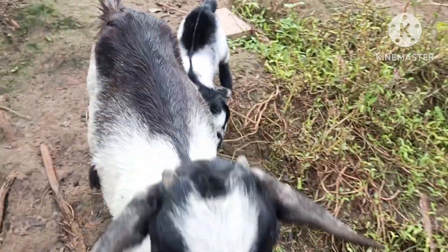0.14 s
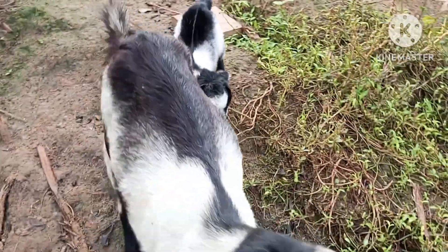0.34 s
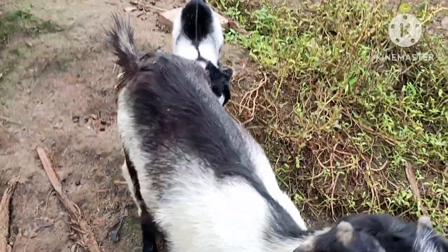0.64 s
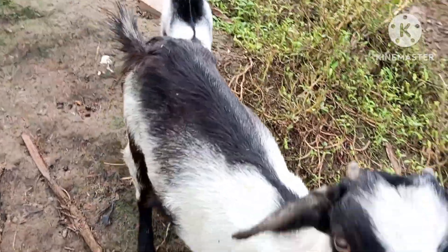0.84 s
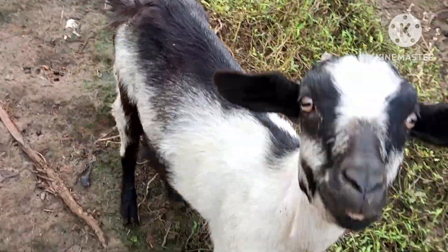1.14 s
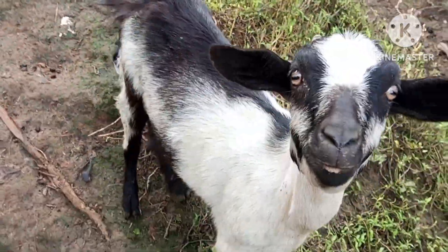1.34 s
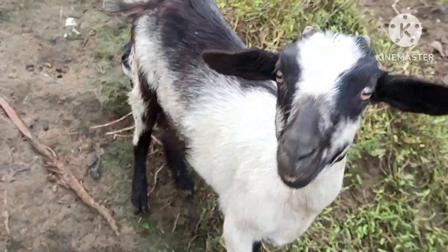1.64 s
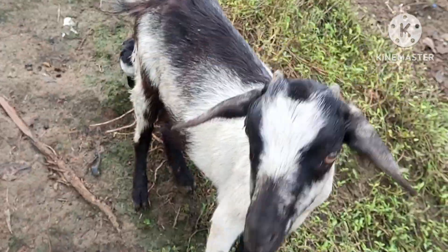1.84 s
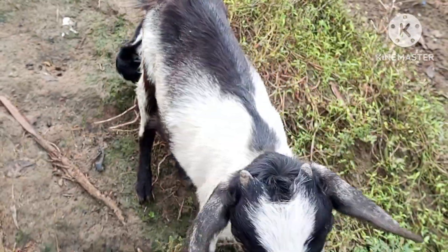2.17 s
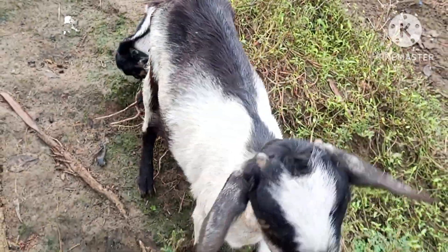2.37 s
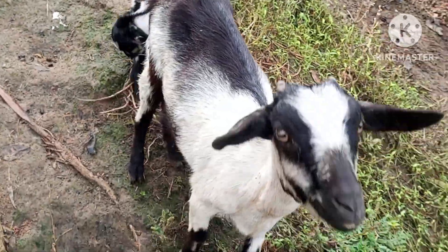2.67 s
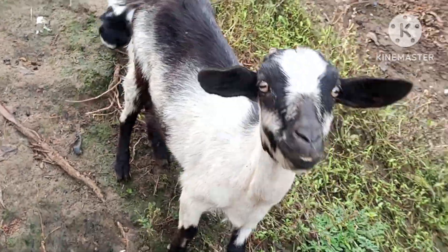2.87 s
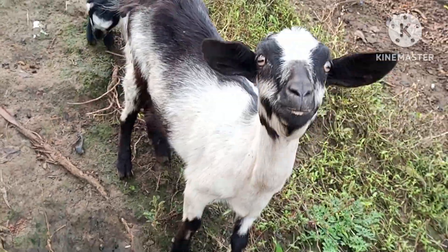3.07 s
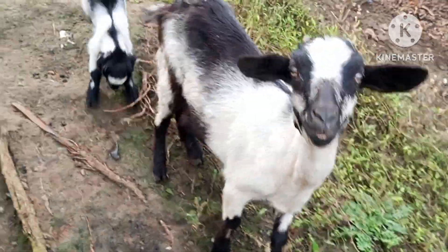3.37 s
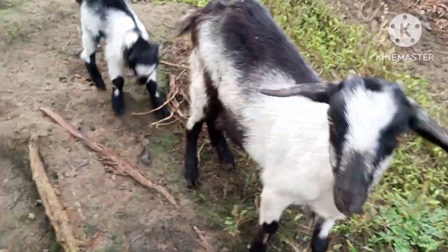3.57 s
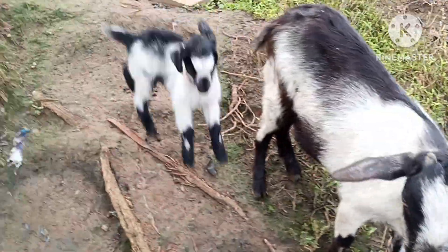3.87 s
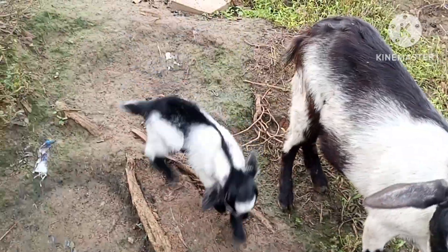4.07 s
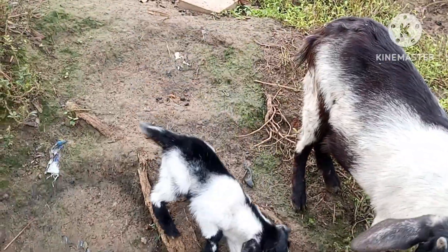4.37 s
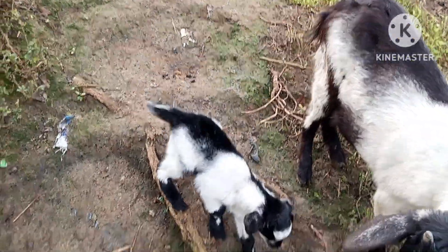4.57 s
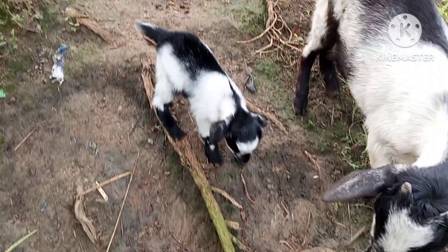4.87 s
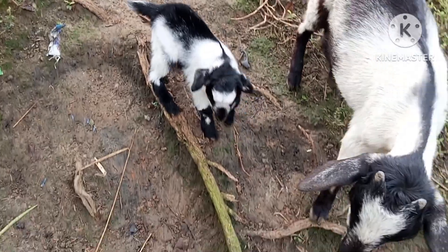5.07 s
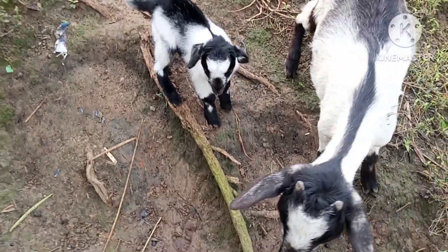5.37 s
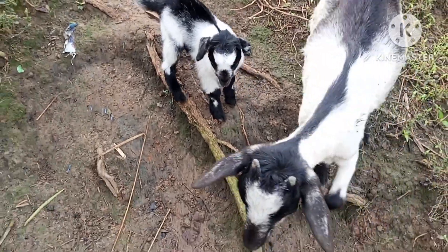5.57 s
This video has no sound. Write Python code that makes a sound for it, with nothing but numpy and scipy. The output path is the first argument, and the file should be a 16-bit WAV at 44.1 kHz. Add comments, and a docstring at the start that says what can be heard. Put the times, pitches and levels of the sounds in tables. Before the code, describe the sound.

Close twig snaps and leafy rustles from moving goats open the scene over soft air noise. A thin pulsing bird whistle leads into a strong rooster crow, echoing lightly off the surroundings, its long note rough and breaking. Then a weak distant crow replies among falling chirps, with sharper hoof knocks near the microphone around four seconds.

```python
"""Soft crackling hiss, a short low hum falls away and a goat's step snaps twigs; then a rooster crows. A second
rooster answers from far away. Both voices are wavering tones with overtones on top. Small birds chirp and
whistle with sliding or pulsing tones. Goats step and scuff: shaped bursts of noise, with stretches of crackling
hiss between. Random echoes throw the calls back, over soft air noise, a hiss and a faint hum."""
import sys
import numpy as np
from scipy import signal
from scipy.fft import rfft, irfft
from scipy.io import wavfile
from scipy.ndimage import uniform_filter1d

SR = 44100
rng = np.random.default_rng(int(sys.argv[2]) if len(sys.argv) > 2 else 0)


def wrap_up_sound(samples):
    """Save the sound to the file named by the first command line argument, as 16-bit audio."""
    columns = np.atleast_2d(samples).T
    # keep every value between -1 and 1, then stretch to whole-number steps
    tamed = np.clip(columns, -1, 1)
    steps = np.round(tamed * 32767).astype(np.int16)
    wavfile.write(sys.argv[1], SR, steps)


N = 252252
TIME, FREQS = np.arange(N) / SR, np.fft.rfftfreq(N, 1 / SR)  # s, Hz
ONSET_S, RELEASE_S = 0.022, .02  # of every syllable and voice break


# a soft cluck, then the short syllables that open the crow:
# start t/s, length t/s, top pitch f/Hz, effort level/dB, overtones level/dB, roughness 0-1
SYLLABLES = [(1.124, 0.051, 790, -56.5, -97, 0.54), (1.402, 0.096, 726.2, -45, -54, 0.02),
             (1.507, .08, 760, -53.5, -62.5, .45), (1.614, 0.17, 920, -31, -57.5, .14)]
# the long closing note:
# t/s, pitch f/Hz, roughness 0-1, effort level/dB, overtones level/dB, open-beak ring level/dB
LONG_NOTE = [(1.777, 775, .7, -45.5, -51, -64), (1.835, 846, .3, -29, -65, -62),
             (1.87, 884, 0.29, -37, -61.5, -65), (1.959, 895, .6, -41, -58, -66),
             (2.01, 867.5, 0.3, -37.5, -76.5, -74.5), (2.18, 851.8, .4, -43, -68.5, -86),
             (2.36, 793.7, 0.2, -35.5, -68, -78), (2.46, 677, .2, -52.5, -66, -66.5),
             (2.56, 702, .15, -43.5, -64.5, -74.5), (2.781, 708, 0.33, -53, -62.5, -67),
             (2.88, 690, .06, -44, -60.5, -67), (3.088, 668.4, 0.2, -47.5, -62, -90),
             (3.212, 547, 0.3, -60, -77, -79)]
# the windpipe favours the fundamental as it sweeps through its resonance: f/Hz, level/dB
WINDPIPE = [(560, -14.5), (700, -4.5), (790, -8.5), (840, -2), (880, -7.5), (920, -23)]
# the band where the open beak rings: f/Hz, level/dB
BEAK_BAND = [(5150, -39), (5600, 5), (6100, 5), (6500, -27)]
ARCH_PER_S = 1.3  # share by which the pitch lies lower at a syllable's ends, per second of its length


def rooster(beak_below_db=-6):
    """Short syllables, then a long hoarse note that splits in two, clears and sinks."""
    opening = []
    for start, length, hz, effort, strain, rough in SYLLABLES:
        opening.append((start, length, hz, rough, effort, strain, strain + beak_below_db))
    gate, hz, rough, effort_db, strain_db, beak_db = phrase(opening, LONG_NOTE, ARCH_PER_S)
    level = gain_of(effort_db + read(WINDPIPE, hz))
    low, high = syrinx(hz, np.clip(rough, 0, 1), jitter=.06, shimmer=.55, rasp=.4)
    second, second_low, second_high = second_voice()
    # both sides of the voice organ draw on one airstream
    share = np.clip(1 - (second / level) ** 2, .3, 1)
    first = uniform_filter1d(gate * level * np.sqrt(share), size=500)
    edge = gate * gain_of(strain_db) * high + second_high
    ring = gate * gain_of(beak_db) * coloured(high, BEAK_BAND)
    body = yard(first * low + second_low, wet_db=-4.5)
    # the beamed overtones carry more echo than the body
    return body + yard(edge + ring, wet_db=-3.0)


# weight of the overtones: f/Hz, level/dB
THROAT = [(1100, -4), (1450, -0.5), (1850, 2), (1940, 3), (2040, -7), (2130, -16), (2400, -7),
          (2750, -28.5), (3450, -11.5), (4100, -20), (4500, -31), (4800, -16), (5150, -30), (5700, -25),
          (7000, -21.5), (9000, -60.5)]
HOARSE_PULSES_HZ, HOARSE_PULSE_DEPTH = 33, 1  # depth is scaled by the roughness


def syrinx(hz, rough, jitter, shimmer, rasp):
    """A fluttering membrane: its fundamental, and its overtones and pulsed rasp through the throat."""
    unsteady_hz = hz * (1 + jitter * (rough + .06) * wander(110))
    phase = 2 * np.pi * np.cumsum(unsteady_hz) / SR
    # hoarse stretches slip into a three-cycle pattern
    growl = rough ** 2 * np.cos(phase / 3 + wander(40))
    pulses = HOARSE_PULSE_DEPTH * np.cos(2 * np.pi * HOARSE_PULSES_HZ * TIME + 2 * wander(6.4))
    flutter = 1 + rough * (shimmer * wander(60) + pulses) + .12 * growl
    closure = phase + .22 * rough * wander(450) + .45 * growl
    overtones = np.zeros(N)
    for k in range(2, 13):
        weight = gain_of(read(THROAT, k * hz) + 3.9 * wander(21))
        overtones += weight * np.cos(k * closure)
    # breath noise that swells once per cycle
    breath = rng.standard_normal(N) * (1 + np.cos(phase))
    puffs = coloured(breath, [(500, -30)] + THROAT)
    fundamental = np.sqrt(2) * flutter * np.cos(phase)
    return fundamental, np.sqrt(2) * flutter * overtones + rasp * rough * puffs


# the other side of the syrinx breaks into a pitch of its own:
# start t/s, length t/s, starting pitch f/Hz, level/dB
SECOND_VOICE = [(1.472, 0.05, 880, -57), (1.512, 0.03, 1158, -53.5), (2.53, .05, 581, -62.5),
                (2.579, 0.28, 785, -51.5), (2.673, 0.1, 613.4, -62), (2.9, 0.14, 769, -63.5)]
SECOND_SAG_HZ_PER_S = 50


def second_voice(jitter=0.017, shimmer=0.55, octave_db=-12):
    """Brief, unsteady breaks at a slowly sagging pitch: their level, fundamental and octave."""
    level, low, octave = np.zeros((3, N))
    for start, length, pitch_hz, db in SECOND_VOICE:
        envelope = gain_of(db) * held(start, length, ONSET_S, RELEASE_S)
        on = envelope > 0
        sagging_hz = pitch_hz - SECOND_SAG_HZ_PER_S * (TIME[on] - start)
        hz = sagging_hz * (1 + jitter * wander(110)[on])
        phase = 2 * np.pi * np.cumsum(hz) / SR
        swell = np.sqrt(2) * envelope[on] * (1 + shimmer * wander(49)[on])
        level += envelope
        low[on] += swell * np.cos(phase)
        octave[on] += swell * gain_of(octave_db + read(THROAT, 2 * hz)) * np.cos(2 * phase)
    return level, low, octave


# syllables of the far rooster:
# start t/s, length t/s, top pitch f/Hz, fundamental level/dB, octave level/dB
FAR_SYLLABLES = [(3.43, 0.12, 945, -67.5, -91), (3.73, 0.13, 839, -83.5, -60.5),
                 (3.98, .08, 947, -65, -62.5), (4.05, .16, 838.4, -58, -64.5)]
# its long note: t/s, pitch f/Hz, fundamental level/dB, octave level/dB
FAR_NOTE = [(4.189, 937, -62, -59.5), (4.251, 965, -77, -57), (4.359, 940, -80, -75.5),
            (4.5, 950, -77.5, -54.5), (4.57, 937, -79, -56), (4.593, 916, -49.5, -53),
            (4.679, 919, -67.5, -58), (4.821, 863, -96, -72), (5.05, 846, -89.5, -66.5),
            (5.17, 845.5, -83, -57), (5.279, 844, -95.5, -85)]
FAR_ARCH_PER_S = .6  # pitch arch, counted as for the near rooster
# where its voice splits and a side tone rides above its octave
FAR_SPLIT_START_S, FAR_SPLIT_LENGTH_S = 4.42, 0.417
FAR_SPLIT_RATIO, FAR_SPLIT_DB = 1.11, -7  # pitch and level against the octave


def far_rooster(jitter=0.021):
    """Little but the two lowest partials carries this far, hoarse and briefly split."""
    gate, hz, low_db, octave_db = phrase(FAR_SYLLABLES, FAR_NOTE, FAR_ARCH_PER_S)
    phase = 2 * np.pi * np.cumsum(hz * (1 + jitter * wander(110.3))) / SR
    upper = np.cos(2 * phase) + gain_of(-22.5) * np.cos(3 * phase) + gain_of(-17.5) * np.cos(4 * phase)
    split_time = held(FAR_SPLIT_START_S, FAR_SPLIT_LENGTH_S, ONSET_S, RELEASE_S)
    split = gain_of(FAR_SPLIT_DB) * split_time * wander(60)
    side_tone = split * np.cos(2 * FAR_SPLIT_RATIO * phase)
    call = gain_of(low_db) * np.cos(phase) + gain_of(octave_db) * (upper + side_tone)
    return yard(gate * call * (1 + .5 * wander(37)), wet_db=-2.5)


# a long thin bird whistle: t/s, pitch f/Hz, level/dB
WHISTLE = [(.77, 3160, -71), (.815, 3170, -53.5), (.97, 3287, -55), (1.17, 3270, -46.5),
           (1.31, 3305, -55.5), (1.48, 3307, -61), (1.53, 3340, -77)]
WHISTLE_PULSES_HZ, WHISTLE_PULSE_DEPTH = 42, 0.38


def whistler():
    """A bird's one nearly pure, quickly pulsing note."""
    gate, hz, level_db = curves(WHISTLE)
    phase = 2 * np.pi * np.cumsum(hz * (1 + 0.0083 * wander(80))) / SR
    buzz = 1 + 0.13 * np.cos(2 * np.pi * 465 * TIME + wander(40))  # weak side tones
    pulsing = 1 + WHISTLE_PULSE_DEPTH * np.cos(2 * np.pi * WHISTLE_PULSES_HZ * TIME + wander(23))
    return yard(gate * gain_of(level_db) * buzz * pulsing * np.cos(phase), wet_db=-1)


# falling chirps: t/s, length t/s, start f/Hz, level/dB
CHIRPS = [(0.126, 0.034, 4370, -65.5), (0.34, 0.032, 3870, -54.5), (0.495, .075, 4425, -48.5),
          (0.802, 0.042, 2700, -58.5), (0.811, .075, 4655, -60), (1.131, .09, 4740, -53.5),
          (1.317, .105, 3032, -55), (1.419, .075, 4610, -58), (1.779, 0.077, 4160, -55),
          (2.56, 0.09, 4440, -59.5), (2.984, .11, 4710, -52.5), (3.335, .04, 4290, -56),
          (3.694, 0.079, 4400, -55), (4.368, 0.055, 4120, -67), (4.982, 0.038, 2927, -59.5),
          (5.518, 0.046, 4490, -54)]
SLIDE_HZ_PER_S = 9500  # total fall per second of a chirp's length


def chirps():
    """Quick, trembling slides that flatten out and linger; the longer, the further they fall."""
    out = np.zeros(N)
    for start, length, start_hz, db in CHIRPS:
        u = np.linspace(0, 1, int(length * SR))  # progress through the chirp
        hz = start_hz - SLIDE_HZ_PER_S * length * (1 - (1 - u) ** 1.5)
        hz = hz * (1 + .011 * burst(150, 1)[:len(u)])
        swell = np.sqrt(4 * u * (1 - u)) * gain_of(3 * burst(60, 1)[:len(u)])
        add(out, start, gain_of(db) * swell * np.sin(2 * np.pi * np.cumsum(hz) / SR))
    return yard(out, wet_db=1)


# twigs and grit snapping under hooves:
# t/s, level/dB before the fade, centre f/Hz, spread in octaves, time to fade by 60 dB t/s
SNAPS = [(.086, -55.5, 3660, 0.49, 0.029), (0.245, -53, 6850, 1, 0.019), (.454, -37, 4200, .8, 0.022),
         (0.456, -55, 7900, 1.1, 0.07), (0.563, -45.5, 2610, 1, 0.034), (0.579, -58, 7440, .7, 0.045),
         (0.63, -52, 1710, 0.89, 0.14), (0.851, -66.5, 9850, 0.5, 0.092), (1.277, -54, 9150, 0.53, .019),
         (3.664, -57, 3060, 0.86, 0.11), (3.836, -55.5, 2080, 0.75, .12), (3.857, -48.5, 4460, 0.45, 0.008),
         (4.019, -48.5, 1770, 0.61, .061), (4.065, -47, 6500, 0.8, 0.015),
         (4.259, -24.5, 2745, 0.54, 0.0044), (4.489, -72.5, 9040, 0.88, 0.27),
         (4.941, -56, 4560, 0.44, 0.033), (4.986, -55, 3970, 0.44, 0.023), (5.178, -64, 8090, .7, 0.066),
         (5.432, -43.5, 6800, 0.3, 0.013), (5.525, -60, 8400, 0.66, 0.043)]
# hooves and knocks on soil and wood: same columns as the snaps
KNOCKS = [(.09, -47.5, 920, 0.78, 0.048), (.547, -36.5, 1160, 0.025, 0.076), (3.498, -51, 213, 0.37, 0.11),
          (3.496, -42, 875, 0.047, 0.047), (4.051, -32, 604, 0.56, 0.059), (4.066, -56.5, 180, 0.62, 0.085),
          (4.29, -51.5, 144, 0.19, 0.074), (4.262, -47, 720, 0.46, 0.13), (4.288, -41.5, 540, 0.78, 0.05),
          (4.887, -56, 1010, 1.03, 0.24), (4.896, -45, 368, 0.28, 0.046)]
# hooves dragging through dirt: start t/s, length t/s, level/dB, centre f/Hz
SCUFFS = [(0.456, 0.269, -58, 3160), (3.203, 0.081, -59.5, 3730), (3.631, 0.079, -70, 4540),
          (4.261, 0.016, -62, 2220), (4.723, 0.14, -67.5, 3150)]


def goats():
    """Snaps, dull knocks and gritty scuffs close by, all made from short bursts of noise."""
    drag, steps = np.zeros((2, N))
    for start, length, db, hz in SCUFFS:
        grit = burst(hz, 0.54)[:int(length * SR)]
        add(drag, start, gain_of(db) * grit * signal.windows.tukey(len(grit), .12))
    # the grit flickers but keeps its overall level
    drag = np.std(drag) * patchy(drag * gain_of(2.5 * wander(200)), depth_db=4.5)
    for start, db, hz, octaves, t60 in SNAPS:
        add(steps, start, hit(db, hz, octaves, t60, rise_s=.00015))
    for start, db, hz, octaves, t60 in KNOCKS:
        add(steps, start, hit(db, hz, octaves, t60, rise_s=0.011))
    return steps + drag


# stretches of crackling hiss: start t/s, length t/s, level/dB at the start
HISS_STRETCHES = [(-.02, 0.11, -66), (.15, 0.93, -63), (0.43, 0.263, -60), (0.823, 0.053, -71), (1.023, 0.35, -69),
                  (1.363, 0.21, -69), (1.653, 1.3, -69.5), (3.21, 0.19, -60), (3.477, 0.085, -65.5),
                  (3.609, 0.072, -61.5), (3.71, .17, -65.5), (3.999, 0.11, -59.5), (4.122, 0.15, -69.5),
                  (4.245, 0.076, -59), (4.458, 0.41, -66.5), (5.113, 0.14, -66.5), (5.26, 0.17, -69),
                  (5.385, 0.33, -65)]
# colour of the fizz: f/Hz, relative level/dB per Hz
FIZZ = [(500, -37), (1500, -15), (2800, -3), (3800, 2.5), (4400, 4.5), (5050, -10.5), (5800, 4),
        (7000, 6.5), (8000, -2), (9500, -24), (12000, -16), (15500, -30)]
# colour of the separate crackles: f/Hz, relative level/dB per Hz
CRACKLES = [(500, -39.5), (2000, -2), (4000, -1), (7000, 8), (9500, -15.5), (12000, -7), (15500, -15)]
STRETCH_ATTACK_S, STRETCH_RELEASE_S = 0.023, 0.017
STRETCH_FADE_DB, FIZZ_REST_DB = -5, -80.5  # fade over one stretch; level between stretches


def crackling_hiss():
    """Each stretch is a patchy fizz with separate crackles, fading as it goes."""
    level = gain_of(FIZZ_REST_DB) * np.ones(N)
    for start, length, db in HISS_STRETCHES:
        fade_db = STRETCH_FADE_DB * np.clip((TIME - start) / length, 0, 1)
        envelope = held(start, length, STRETCH_ATTACK_S, STRETCH_RELEASE_S)
        level = np.hypot(level, gain_of(db + fade_db) * envelope)
    # about 200 clicks a second, a few much louder than the rest
    clicks = rng.standard_normal(N) * (rng.random(N) < 200 / SR)
    crackles = clicks * gain_of(4.5 * np.minimum(rng.exponential(1, N), 3))
    fizz = patchy(rng.standard_normal(N), depth_db=4)
    return level * (coloured(fizz, FIZZ) + gain_of(-13.5) * coloured(crackles, CRACKLES))


# colour of the still air: f/Hz, relative level/dB per Hz
AIR = [(15, -79.5), (25, -6), (44, -2), (136, 7.5), (331, -3.5), (804, -1.5), (1170, -2.5), (1900, 2.5),
       (3260, -8.5), (3830, 2), (5010, -16), (5880, -0.5), (6920, -12), (9050, -41.5), (15500, -27)]
AIR_DB = -76
# a broad hiss swells under the long note: t/s, level/dB
HISS = [(1.6, -75), (1.93, -66), (1.99, -61.5), (2.29, -67), (2.35, -60.5), (2.53, -67.5), (2.62, -64),
        (3.1, -82)]
# its colour: f/Hz, relative level/dB per Hz
HISS_COLOUR = [(500, -10.5), (1000, 10), (2000, 11.5), (3500, 4), (5000, 0.5), (9000, -12.5),
               (15500, -15.5)]
HUM_HZ, HUM_LOUD_S = 101, .11
HUM_START_DB, HUM_FALL_DB_PER_S, HUM_REST_DB = -52.5, 130, -99


def background():
    """Still outdoor air, a swell of hiss, and a low hum that soon falls away."""
    air = coloured(patchy(rng.standard_normal(N), depth_db=4.0), AIR)
    air = gain_of(AIR_DB) * air * gain_of(.5 * wander(1.6))
    gate, hiss_db = curves(HISS)
    hiss_level = gate * gain_of(hiss_db + 1.8 * wander(50))
    hiss = hiss_level * coloured(rng.standard_normal(N), HISS_COLOUR)
    falling = gain_of(HUM_START_DB - HUM_FALL_DB_PER_S * TIME)
    hum_level = falling * held(0, HUM_LOUD_S, 0.0033, 0.045) + gain_of(HUM_REST_DB)
    rumble_colour = [(70, -24.5), (110, 3), (190, 4), (300, -23.5), (900, -63.5)]  # f/Hz, level/dB
    rumble = coloured(rng.standard_normal(N), rumble_colour)
    tone = np.sqrt(2) * np.sin(2 * np.pi * HUM_HZ * TIME)
    return air + hiss + hum_level * (tone + 0.5 * rumble)


# how long the echoes last: f/Hz, time to fade by 60 dB t/s
YARD = [(200, 0.043), (900, 0.46), (3500, 0.46), (9000, 0.19)]


def yard(x, wet_db):
    """Direct sound plus scattered echoes off walls and trees, each band dying at its own speed."""
    # random echoes, about 1500 a second, none in the first 12 ms
    taps = rng.choice([-1., 1.], SR) * (rng.random(SR) < 1500 / SR) * (TIME[:SR] > .012)
    hz, t, z = signal.stft(taps, SR, nperseg=256)
    decay = gain_of(-60 * t / read(YARD, hz)[:, None])
    tail = signal.istft(z * decay, SR, nperseg=256)[1]
    echo = signal.fftconvolve(x, tail)[:N]
    wet = gain_of(wet_db)
    return (x + wet * evened(echo) * np.std(x)) / np.sqrt(1 + wet ** 2)


def phrase(syllables, long_note, arch_per_s):
    """Syllables that each arch in pitch, then a long note: gate, pitch and further controls over time."""
    gate, hz, *controls = curves(long_note)
    for start, length, top_hz, *values in syllables:
        envelope = held(start, length, ONSET_S, RELEASE_S)
        inside = envelope > gate
        from_middle = 2 * (TIME[inside] - start) / length - 1  # -1 at the start, 1 at the end
        hz[inside] = top_hz * (1 - arch_per_s * length * from_middle ** 2)
        for control, value in zip(controls, values):
            control[inside] = value
        gate = np.maximum(gate, envelope)
    return [gate, hz] + [uniform_filter1d(c, size=300) for c in controls]


def curves(rows):
    """A gate that is open while the rows last, then each column drawn as a line over time."""
    t, *columns = np.transpose(rows)
    gate = uniform_filter1d(1. * ((TIME >= t[0]) & (TIME <= t[-1])), size=400)
    return [gate] + [np.interp(TIME, t, c) for c in columns]


def held(start, length, attack_s, release_s):
    """An envelope that rises, holds and falls."""
    rise = (TIME - start) / attack_s
    fall = (start + length - TIME) / release_s
    return np.clip(np.minimum(rise, fall), 0, 1)


def hit(db, hz, octaves, t60, rise_s):
    """A blow is a burst of noise that rises fast and dies away."""
    ring = burst(hz, octaves)
    t = TIME[:len(ring)]
    return gain_of(db) * ring * (1 - np.exp(-t / rise_s)) * np.exp(-np.log(1000) * t / t60)


def burst(hz, octaves, size=16384):
    """A short stretch of noise in one broad resonance."""
    away = np.log2((np.fft.rfftfreq(size, 1 / SR) + 1) / hz) / octaves
    return evened(irfft(rfft(rng.standard_normal(size)) / (1 + away ** 2 / 2) ** 2))


def patchy(x, depth_db):
    """Makes the colour of a noise flicker in small patches of time and pitch, at rms 1."""
    z = signal.stft(x, nperseg=512)[2]
    patches = uniform_filter1d(rng.standard_normal(z.shape), size=5, axis=0)
    patches = evened(uniform_filter1d(patches, size=7, axis=1))
    return evened(signal.istft(z * gain_of(depth_db * patches), nperseg=512)[1][:N])


def wander(hz, size=16384):
    """Random drift, at rms 1, with little movement faster than hz."""
    speed = np.fft.rfftfreq(size, N / SR / size)
    drift = irfft(rfft(rng.standard_normal(size)) / (1 + (speed / hz) ** 4))
    return np.interp(TIME, np.linspace(0, N / SR, size), evened(drift))


def coloured(x, spectrum):
    """Filters x by a spectrum and sets it to rms 1."""
    return evened(irfft(rfft(x) * gain_of(read(spectrum, FREQS)), N))


def read(points, hz):
    """Reads a spectrum on a log-frequency axis, in steps of pitch as the ear does."""
    f, value = np.transpose(points)
    return np.interp(np.log(hz + 1), np.log(f + 1), value)


def gain_of(db):
    """Turns decibels into a factor to multiply by."""
    return 10 ** (np.asarray(db) / 20)


def evened(x):
    """Scales to an average strength (rms) of 1."""
    return x / np.sqrt(np.mean(x ** 2) + 1e-20)


def add(mix, start, sound):
    """Mixes a sound in at a start time in seconds."""
    part = mix[max(round(start * SR), 0):][:len(sound)]
    part += sound[:len(part)]


def scene():
    """The whole yard at one microphone."""
    birds = rooster() + far_rooster() + whistler() + chirps()
    return (birds + goats() + crackling_hiss() + background())[None]


EDGE_HZ = 15600  # upper band limit


def record(dry):
    """The microphone's bass roll-off and the recorder's band limit."""
    thin = signal.sosfilt(signal.butter(2, 55, "high", fs=SR, output="sos"), dry)
    lowpass = signal.firwin(511, EDGE_HZ, window=("kaiser", 9), fs=SR)
    return signal.oaconvolve(thin, lowpass[None], "same")


dry = scene()
out = record(dry)
wrap_up_sound(out)
```